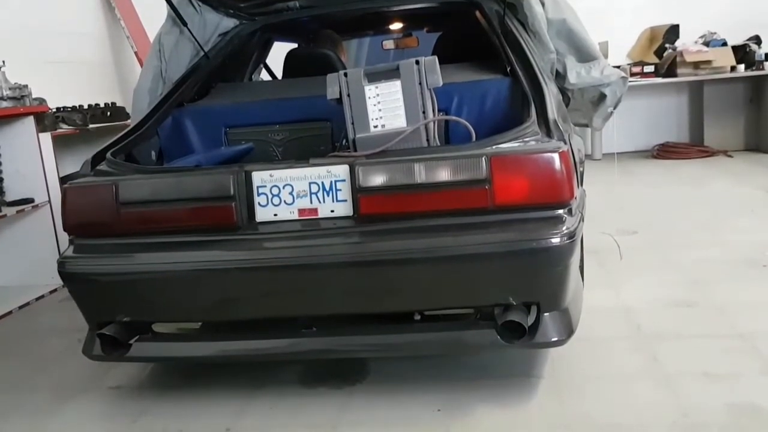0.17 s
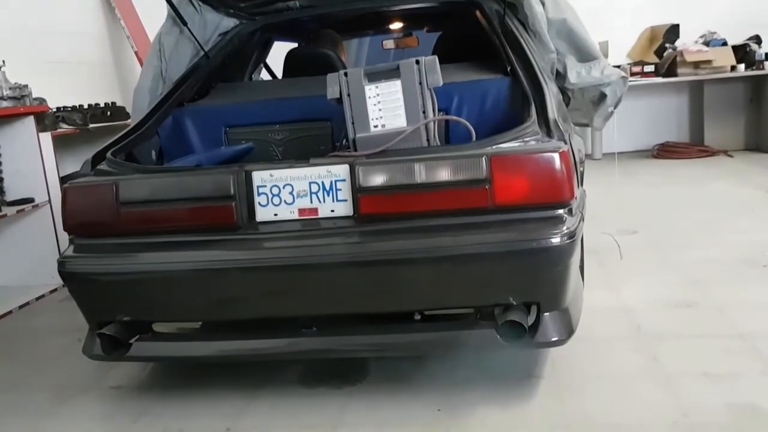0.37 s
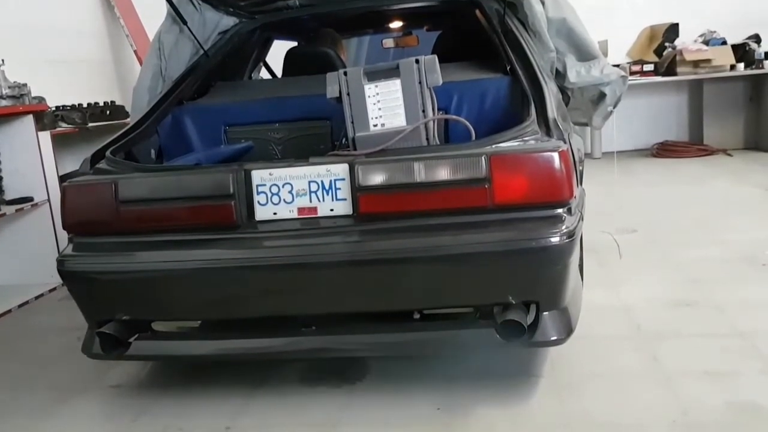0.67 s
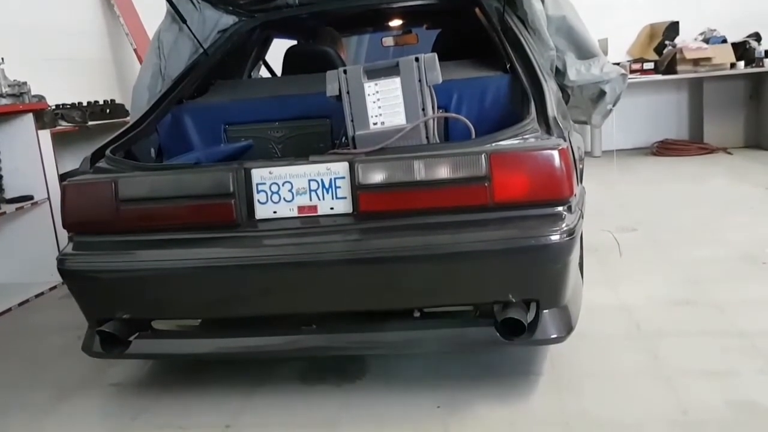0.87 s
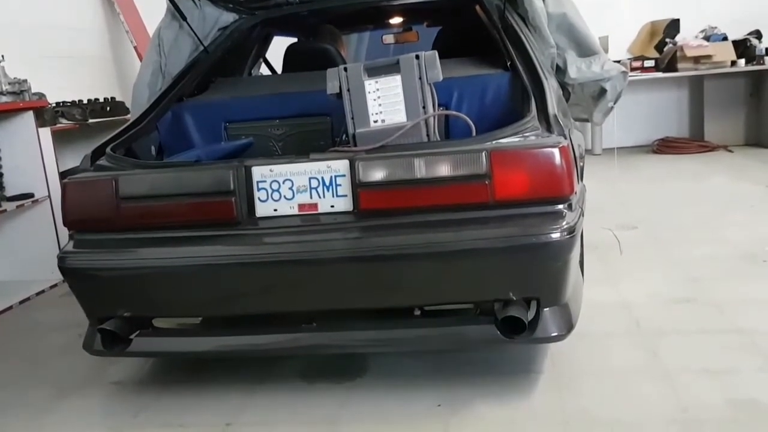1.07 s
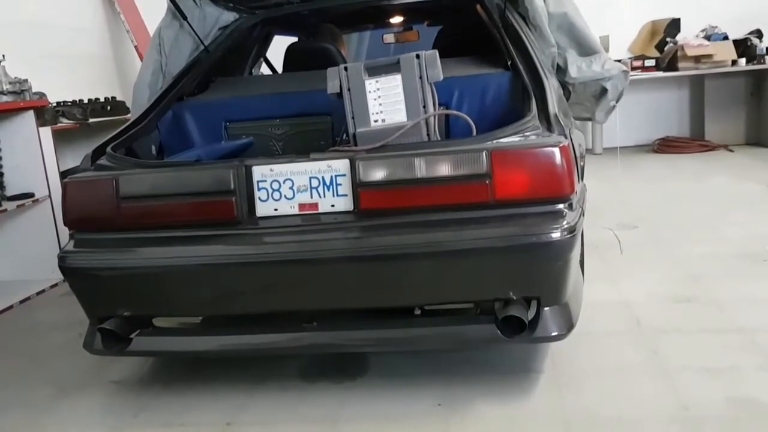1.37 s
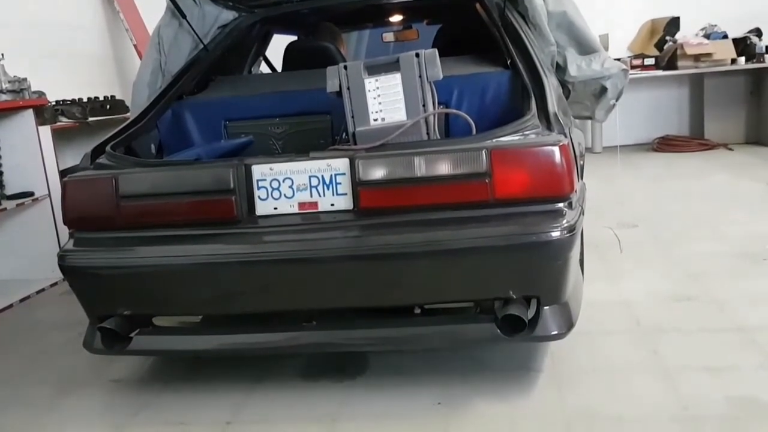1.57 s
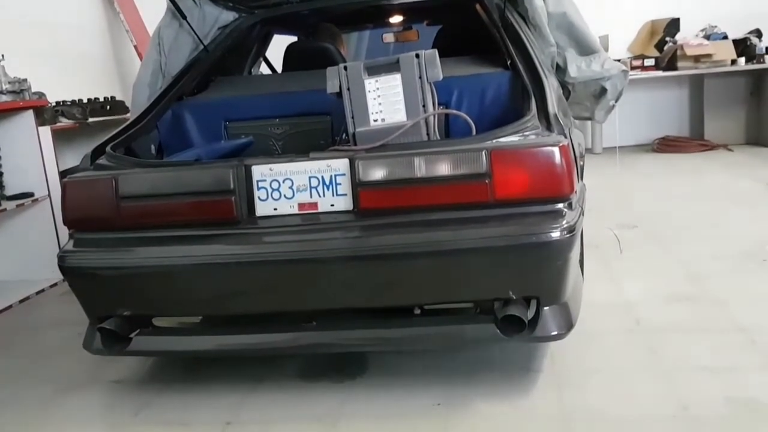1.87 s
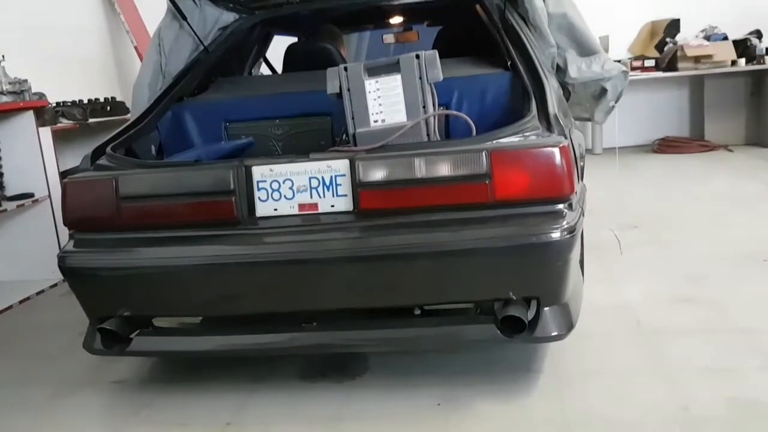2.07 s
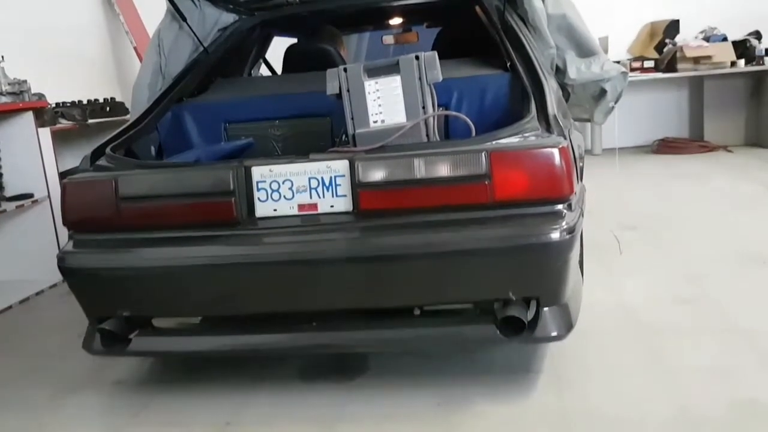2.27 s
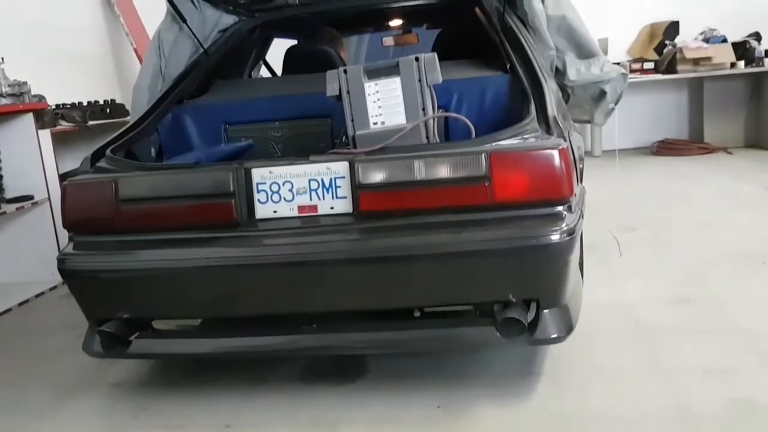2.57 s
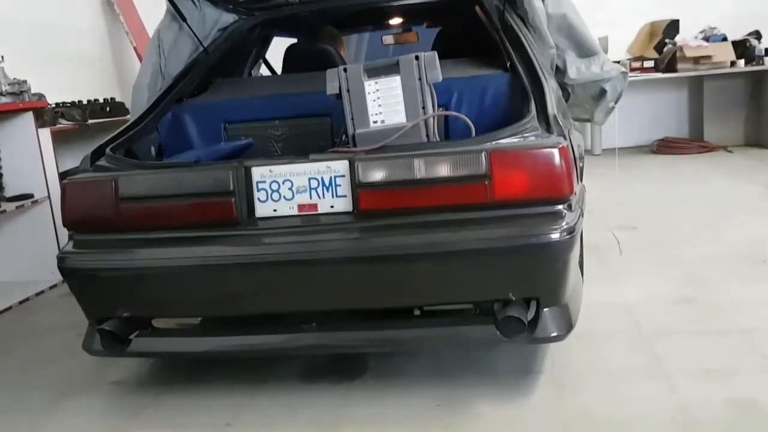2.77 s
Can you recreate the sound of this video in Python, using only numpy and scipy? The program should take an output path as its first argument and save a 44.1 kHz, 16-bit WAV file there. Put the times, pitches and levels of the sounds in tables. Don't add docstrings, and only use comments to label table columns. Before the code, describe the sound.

A car engine idles with a deep uneven rumble, a brief squeak precedes one quick throttle blip, the exhaust barks and rattles, then pitch falls back to idle; close behind the tailpipes in a hard-walled workshop.

```python
import sys
import numpy as np
from scipy import signal
from scipy.fft import rfft, irfft, next_fast_len
from scipy.io import wavfile
from scipy.ndimage import uniform_filter1d

SR = 44100
rng = np.random.default_rng(int(sys.argv[2]) if len(sys.argv) > 2 else 0)


def invert_db(level):
    return 10 ** (np.asarray(level, dtype=float) / 20)


def master(y):
    cut = np.clip(np.atleast_2d(y).T, -1, 1)
    pcm = np.round(cut * 32767)
    wavfile.write(sys.argv[1], SR, pcm.astype(np.int16))


N = 129213

# t/s, engine cycle rate f/Hz, exhaust level/dB, gas flow/dB,
# bark of the upper pipe against its boom level/dB
BLIP = [(0, 13.24, -12, -50.5, -8), (.38, 13, -13, -49.5, -8), (.48, 12.63, -9, -45.5, -7.5),
        (.58, 17.2, -7, -40, -4.5), (.64, 22.6, -4.5, -38, 5.5), (.72, 29.9, -5, -35.5, 11.5),
        (.8, 35.4, -4.5, -34.5, 5), (.855, 35, -7, -38, 5), (1.07, 30.4, -8.5, -38.5, 0.5),
        (1.2, 28.7, -9.5, -41.5, 3), (1.3, 26.4, -8.5, -40.5, -7), (1.5, 22.3, -10.5, -43, -5),
        (1.76, 19.6, -6.5, -45.5, -11.5), (2, 16.3, -10.5, -48, -4), (2.16, 14.3, -11, -49, -9.5),
        (2.36, 14, -10, -50.5, -14), (2.6, 12.2, -16, -50, -3.5), (2.93, 12, -14.5, -51.5, -7)]
# order/multiple of the cycle, level/dB, change on overrun/dB,
# change from idle to peak speed/dB
ENGINE_ORDERS = [(2, -13, -0.5, 3.8), (3, -15.5, 1.8, 0.1), (4, -4, 0, 7), (5, -3, 4.5, -3.5),
                 (6, -5.5, 7.5, -8), (7, -15, -2, 11.5), (8, 3, -10.5, 7), (9, -3, -4, -4.5),
                 (10, -9, 2.5, 1), (11, -11, 0.5, 3.5), (12, -8.5, 2, 4.5), (13, -5, -7, -0.7),
                 (14, -5.5, 4, -9), (15, -7.5, -3.5, -2), (16, -2.5, -8.5, -7), (17, -11, -1.5, -2),
                 (18, -13, -2, 1.5), (19, -12, 1.3, 2.5)]
# t/s, odd orders against even ones level/dB
IDLE_LOPE = [(0, -8), (.18, -7.5), (.27, 7.5), (.4, 7.5), (.46, -5), (.6, 3.7), (1.98, -2), (2.08, -3),
             (2.38, -1.5), (2.48, 9.5), (2.6, -2), (2.72, -6), (2.93, -3)]
# f/Hz, width/Hz, level/dB, gain per dB of flow/dB
PIPE_RESONANCES = [(50, 53, -25.5, 1.43), (120, 16.7, 4, 0), (142.2, 31, -12, 1.5),
                   (225.1, 23.8, -10.5, 0.61), (271.8, 42.6, -14.5, 1), (344.5, 22.2, -12, 0.68),
                   (382.5, 47, -25, 2), (471, 92, -21.5, 1.24), (572.5, 26.6, -19, 1.22),
                   (674, 127, -25.5, 1.5), (879, 120, -36, 1.69), (1039, 130, -34, 1.06)]
# t/s, peak level/dB, pitch f/Hz
HARD_FIRINGS = [(0.241, -20, 545), (0.661, -16.5, 550), (0.699, -12, 881.8), (0.725, -21, 858),
                (0.913, -12, 560), (1.04, -15.5, 596.4), (1.154, -15.5, 599), (1.594, -18, 556.9),
                (1.705, -21, 578.9), (1.87, -25, 559.7), (2.233, -28, 672.6), (2.564, -26.5, 550.3),
                (2.877, -27.5, 569)]
# f/Hz, level per Hz/dB
ROAR_COLOUR = [(180, -34), (300, -12), (347, -7), (415, -12.5), (565, -11), (633, -14), (2040, -21.5),
               (8350, -46.5), (14500, -87)]
# f/Hz, likeness/0..1
ROAR_LIKENESS = [(300, 0.8), (700, 0.2), (1200, 0.086), (2500, 0.35), (5000, 0.035), (12000, 0.091)]
# f/Hz, left minus right level/dB
ROAR_LEAN = [(60, -0.5), (180, 1.5), (540, -2.5), (1600, 0), (4790, 2), (14300, 7)]
# t/s, peak level/dB, pitch f/Hz
SHIELD_RASPS = [(0.4466, -19.5, 2040), (0.447, -22.5, 1840), (0.5237, -14.5, 1810), (0.5241, -19.5, 2070),
                (0.5806, -17, 2050), (0.601, -17.5, 1933), (0.634, -17, 2100), (0.6484, -15.5, 2024),
                (0.6664, -15.5, 2140), (0.688, -22, 2070), (0.7342, -9, 2215), (0.7666, -18, 2270),
                (0.814, -20, 2090), (0.8959, -30, 2026), (0.9248, -31.5, 1930), (0.9731, -19.5, 2000),
                (0.9941, -21, 1924), (1.03, -24.5, 1970), (1.06, -24.5, 1940), (1.1856, -27.5, 2179)]
# t/s, level/dB, pitch f/Hz
LINKAGE_SQUEAK = [
    (.375, -84.5, 6740),
    (.388, -57, 6900),
    (.395, -42, 6780),
    (.423, -38.5, 6530),
    (.435, -41.5, 6800),
    (.5, -54.5, 6670),
    (.58, -60.5, 6730),
    (.7, -90.5, 6500),
]


def rms_one(x):
    return x / np.sqrt(np.mean(x ** 2) + 1e-20)


def evened(x):
    return x / np.sqrt(uniform_filter1d(x ** 2, size=SR // 5) + 1e-9)


def in_time(rows):
    s, *columns = np.transpose(rows)
    return [np.interp(np.arange(N) / SR, s, column) for column in columns]


def at_hz(points, hz):
    table_hz, value = np.transpose(points)
    return np.interp(np.log(hz), np.log(table_hz), value)


def drift(rate_hz):
    r = np.exp(-80 * np.pi * rate_hz / SR)
    noise = rng.standard_normal(N // 40 + 2002)
    slow = signal.lfilter([1], [1, -2 * r, r * r], noise)[2000:]
    return np.interp(np.arange(N) / 40, np.arange(len(slow)), rms_one(slow))


def band(x, low_hz, high_hz):
    return signal.sosfilt(signal.butter(2, [low_hz, high_hz], "band", fs=SR, output="sos"), x)


def resonance(x, hz, width_hz):
    r = np.exp(-np.pi * width_hz / SR)
    poles = [1, -2 * r * np.cos(2 * np.pi * hz / SR), r * r]
    return signal.lfilter([(1 - r * r) / 2, 0, (r * r - 1) / 2], poles, x)


def twice_resonance(x, hz, width_hz):
    return resonance(resonance(x, hz, width_hz), hz, width_hz)


def whistle(hz, width_hz):
    noise = rng.standard_normal((2, N)) + 0.4 * rng.standard_normal(N)
    return rms_one(twice_resonance(noise, hz, width_hz))


def firings(turns):
    jitter, spread = 0.1, 0.6
    count = int(turns[-1] * 8)
    chance = rng.standard_normal((count, 2))
    fired_at = (np.arange(count) + jitter * chance[:, 0]) / 8
    at = np.interp(fired_at, turns, np.arange(N)).astype(int)
    clicks = np.zeros(N)
    np.add.at(clicks, at, 1 + spread * chance[:, 1])
    return clicks


def firing_orders(turns, fast, overrun):
    lope_db, = in_time(IDLE_LOPE)
    steady = np.zeros(N)
    for k, db, overrun_db, fast_db in ENGINE_ORDERS:
        order_db = db + overrun_db * overrun + fast_db * fast
        order_db = order_db + (k % 2 - 0.5) * lope_db + 2.0 * drift(4)
        wavering = turns + 0.0035 * drift(4)
        steady += invert_db(order_db) * np.sin(2 * np.pi * (k * wavering + rng.random()))
    return steady


def exhaust(turns, clicks, level_db, flow_db, bark_db):
    speed_hz = np.gradient(turns) * SR
    slowing = -np.gradient(uniform_filter1d(speed_hz, size=SR // 10)) * SR
    overrun = np.clip(slowing / 7.1, 0, 1)
    fast = (speed_hz - 13) / (35 - 13)
    uneven_db = 31 + 8 - 0.19 * flow_db
    gas = firing_orders(turns, fast, overrun) + clicks * invert_db(uneven_db)

    run_in = SR // 8
    gas = np.r_[gas[run_in:0:-1], gas]
    rings = []
    for k, (hz, width_hz, db, follows) in enumerate(PIPE_RESONANCES):
        sign = (-1) ** (k + (k > 1))
        ring = twice_resonance(gas, hz, 1.28 * width_hz)[run_in:]
        rings.append(sign * invert_db(db + follows * flow_db) * ring)
    boom, bark = evened(sum(rings[:3])), evened(sum(rings[3:]))

    pull = invert_db(2.5) * np.clip(-slowing / 35, 0, 1) * np.sin(2 * np.pi * 8 * turns)
    out = boom + resonance(pull, 138, 65) + invert_db(bark_db) * bark
    return invert_db(level_db) * out / np.sqrt(1 + invert_db(2 * bark_db))


def pops():
    out, t = np.zeros(N + SR), np.arange(SR // 8) / SR
    t60_s = 0.06
    for s, db, hz in HARD_FIRINGS:
        i = int(s * SR)
        out[i:i + len(t)] += invert_db(db - 60 * t / t60_s) * np.sin(2 * np.pi * hz * t)
    return out[:N]


def roar(clicks, flow_db):
    puff = 1 + 0.1 * (rms_one(signal.lfilter([1], [1, -0.99], clicks)) - 1)
    edges = 280 * 2 ** np.arange(0, 6.1, 0.5)
    white = rng.standard_normal((2, 2, N))
    out = 0
    for k, (low, high) in enumerate(zip(edges, edges[1:])):
        mid, side = band(white[k % 2], low, high)
        hz = np.sqrt(low * high)
        alike = np.clip(at_hz(ROAR_LIKENESS, hz), 0, 1)
        tilt_db = 0.042 * np.log2(hz / 3000) * flow_db
        lean_db = at_hz(ROAR_LEAN, hz) * np.array([[0.5], [-0.5]])
        gain = invert_db(at_hz(ROAR_COLOUR, hz) + tilt_db + 1.23 * drift(3) + lean_db)
        out = out + gain * (np.sqrt(1 + alike) * mid + np.sqrt(1 - alike) * side * [[1], [-1]])
    return invert_db(-29 + 0.88 * flow_db) * puff * rms_one(out)


def shield(flow_db):
    out = invert_db(-44 + 0.68 * flow_db) * whistle(2002, 720)
    t = np.arange(SR // 8) / SR
    rise_s, decay_s = 0.0042, 0.019
    envelope = np.minimum(t / rise_s, 1) * np.exp(-t / decay_s)
    side_db = -7 - 2 * np.array([[1], [-1]])
    for s, db, hz in SHIELD_RASPS:
        noise = rng.standard_normal((2, len(t))) + 1.7 * rng.standard_normal(len(t))
        burst = rms_one(twice_resonance(noise, hz, 280))
        i = int(s * SR)
        out[:, i:i + len(t)] += invert_db(db + side_db) * burst * envelope
    return out


def squeak():
    level_db, hz = in_time(LINKAGE_SQUEAK)
    pitch_hz = hz + 190 * np.array([drift(150), drift(150)])
    turns = np.cumsum(pitch_hz, axis=1) / SR
    slips = invert_db(level_db + 1.9 * drift(120))
    chirp = np.sin(2 * np.pi * turns) + invert_db(-22.5) * np.sin(4 * np.pi * turns)
    hiss = band(rng.standard_normal((2, N)), 3500, 11000)
    return slips * chirp + invert_db(level_db - 9) * hiss


def fan():
    return invert_db(-51.5) * whistle(3703, 660)


def rumble():
    return invert_db(-36.5) * rms_one(band(rng.standard_normal(N), 25, 70))


def shop(x):
    t60_s, wall_cut_hz, low_hz = 0.96, 3900, 340
    size = next_fast_len(N + SR)
    hz = np.arange(size // 2 + 1) * SR / size
    lags = rng.uniform(0.02, 0.06, (2, 10, 1))
    one_round = invert_db(-60 * lags / t60_s) * np.exp(-2j * np.pi * hz * lags) / (1 + 1j * hz / wall_cut_hz)
    echo = (one_round / (1 - one_round)).sum(axis=1)
    echo = echo * hz ** 3 / (hz ** 3 + low_hz ** 3)
    return irfft(echo * rfft(x, size), size)[:, :N]


def scene():
    speed_hz, level_db, flow_db, bark_db = in_time(BLIP)
    flow_db = flow_db - flow_db.mean()
    turns = np.cumsum(speed_hz) / SR
    clicks = firings(turns)
    pipe = exhaust(turns, clicks, level_db, flow_db, bark_db) + pops()
    metal = shield(flow_db) + squeak()
    air = roar(clicks, flow_db) + metal + fan()
    lag = round(0.0005 * SR)
    air[1] = np.interp(np.arange(N) - lag, np.arange(N), air[1])
    middle = (pipe + rumble()) * invert_db([[-0.4], [0.4]])
    return middle + air + invert_db(-15.5) * shop(pipe + metal.mean(axis=0))


def roll_off(x):
    return signal.sosfilt(signal.butter(12, 14920, fs=SR, output="sos"), x)


def record(dry):
    x = signal.sosfilt(signal.butter(3, 36, "high", fs=SR, output="sos"), dry)
    x = x / (1 + (x / 0.98) ** 4) ** 0.25
    to_nearest_end = np.minimum(np.arange(N), np.arange(N)[::-1])
    x = x * np.minimum(to_nearest_end / (0.004 * SR), 1)
    return roll_off(x)


dry = scene()
out = record(dry)
master(out)
```